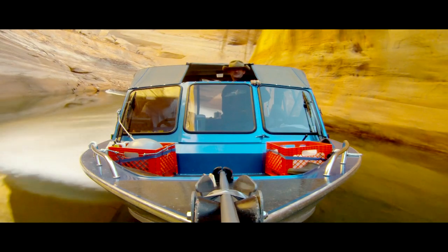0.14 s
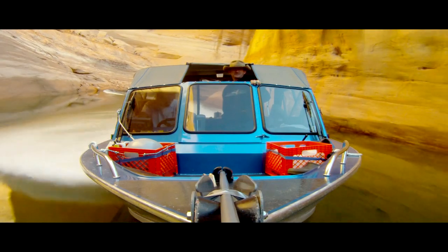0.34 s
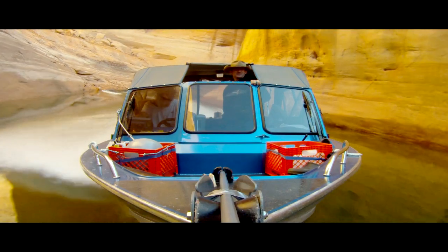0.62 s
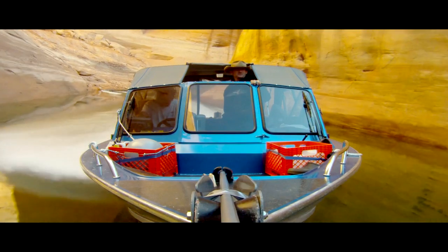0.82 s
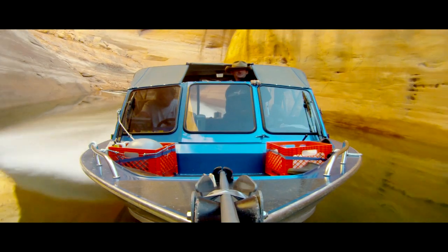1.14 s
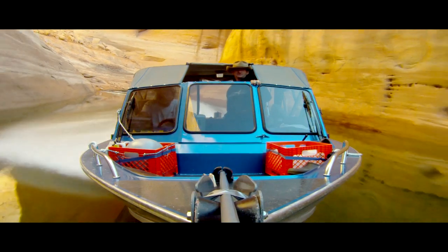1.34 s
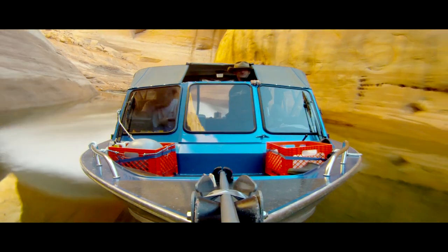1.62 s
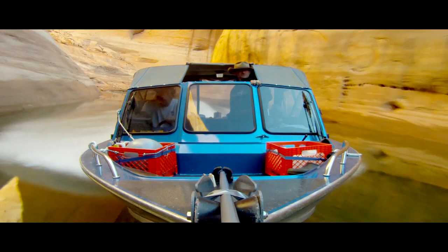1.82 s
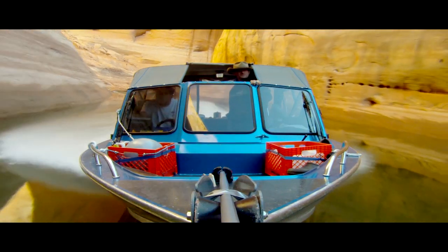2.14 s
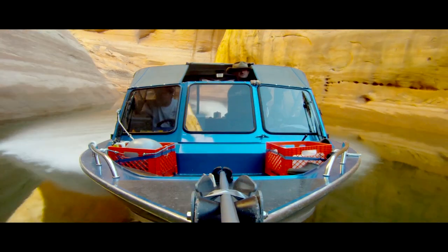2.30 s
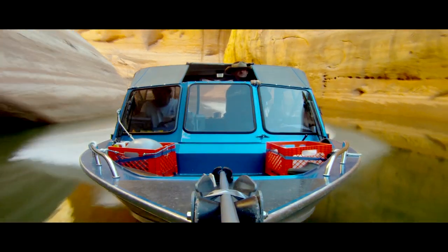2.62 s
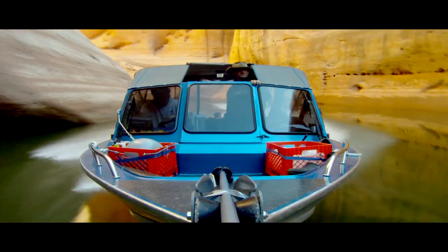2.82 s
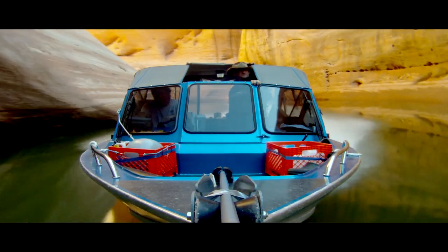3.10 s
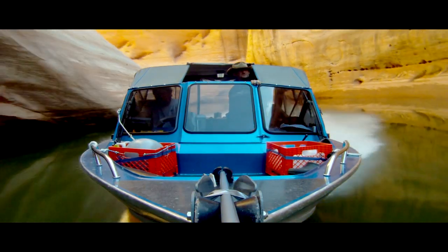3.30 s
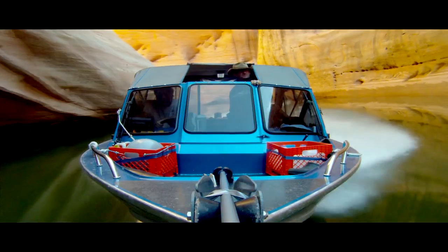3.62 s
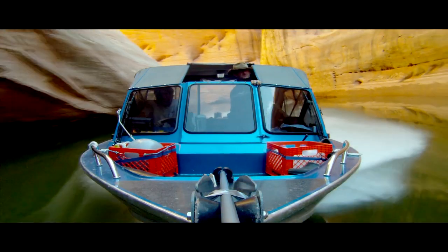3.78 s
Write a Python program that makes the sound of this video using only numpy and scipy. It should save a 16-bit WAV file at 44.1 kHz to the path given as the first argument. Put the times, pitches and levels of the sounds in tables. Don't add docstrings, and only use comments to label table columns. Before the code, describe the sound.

A jet boat's engine and pump hold a loud, low, buzzing drone from the start, fluttering as canyon-wall echoes thin it. Water rushes and drums the metal hull; a loose camera mount ticks. Slaps and knocks begin near 0.3 seconds, faint thin pump whines near 0.7. After 2.5 the pitch sags slightly and water hits harder, the drone choppier, until a cut-off at full roar. Close, boxy, gritty sound.

```python
import sys
import numpy as np
from scipy import signal
from scipy.fft import rfft, irfft
from scipy.io import wavfile
from scipy.ndimage import uniform_filter1d

SR = 44100
rng = np.random.default_rng(int(sys.argv[2]) if len(sys.argv) > 2 else 0)


def digitize_waveform(pressure):
    field = np.atleast_2d(pressure).T
    bounded = np.clip(field, -1, 1)
    quanta = np.round(bounded * 32767).astype(np.int16)
    wavfile.write(sys.argv[1], SR, quanta)


def amplitude_ratio(level_db):
    exponent = np.asarray(level_db, float) / 20
    return 10 ** exponent


N = 174195
T = np.arange(N) / SR

# time in seconds, cam turns per second.
CAM_SPEED = [
    (0, 33.14),
    (.45, 33.16),
    (1.0, 33.24),
    (1.5, 33.3),
    (1.95, 33.24),
    (2.55, 33.09),
    (2.85, 32.96),
    (3.45, 32.79),
    (3.95, 32.7),
]
# time in seconds, level in dB.
FIRING_LEVEL = [(0.0, -17.5), (0.26, -14.5), (0.53, -18.5), (0.79, -19), (1.05, -18.5), (1.31, -18),
                (1.58, -15), (1.84, -16.5), (2.1, -14), (2.36, -14.3), (2.63, -13.5), (2.89, -15),
                (3.15, -21), (3.41, -15), (3.68, -15.5), (3.94, -22.5)]
# time in seconds, level in dB.
BLADE_LEVEL = [(0.0, -21.5), (0.26, -18.5), (0.53, -18.5), (0.79, -19), (1.05, -17.5), (1.31, -19),
               (1.58, -24.5), (1.84, -20.5), (2.1, -20), (2.36, -26), (2.63, -21), (2.89, -23),
               (3.15, -18.7), (3.41, -21.5), (3.68, -19), (3.94, -23.5)]
# time in seconds, load in dB.
WATER_LOAD = [(0, -4.5), (.3, -2), (.6, -1.5), (1.1, -2), (1.5, -2.5), (1.95, -2), (2.25, -5), (2.5, -1),
              (2.7, -3.5), (2.8, 0), (3.0, 0.5), (3.07, -3.5), (3.2, 2.5), (3.38, 1), (3.5, -0.5),
              (3.65, 2), (3.8, 1), (3.95, 1.5)]
# order in cycles per cam turn, level in dB, share of the load in dB per dB.
WEAK_ORDERS = [(1, -57.5, 1), (2, -33.5, 0.93), (3, -46.5, 3), (4, -51, .1), (5, -34, -0.5), (7, -40, 3.5),
               (9, -35, 3), (10, -41.5, 1.2), (14, -41, 1.5), (24, -45, 1.1), (26, -42.5, 0.085),
               (11, -41, 1.5), (15, -49, .3), (18, -63.5, 8), (23, -53.5, .3), (28, -50, 0.33),
               (30, -44.5, .3), (31, -45.5, 0.32), (32, -54.5, .8), (36, -44, .6), (74.4, -68.5, .3)]
# pitch in Hz, width in Hz, level in dB, share of the load in dB per dB.
HULL_PANELS = [(180.3, 12, -47.5, 0.51), (203.6, 32, -31.5, 2.6), (267.2, 55.5, -29, 0.75),
               (313, 24.3, -37.5, 1.3), (330, 40, -43, 2), (383, 19.4, -32, 0.48), (463, 43, -42, 0.89),
               (532.6, 40, -45.5, 1.5), (690.7, 112, -41.5, 1.2), (777.7, 81, -46, 0.2),
               (918.3, 70, -42.5, 0.9), (1033, 57, -37, 0.5), (1095, 94, -37.5, 1.1),
               (1198.8, 99, -37.5, 1.01)]
# pitch in Hz, width in Hz, level in dB.
CASE_CAVITIES = [(1312.6, 44, -48.5), (1413, 190, -53.5), (1847, 180, -60), (2070, 150, -63.5),
                 (2472, 460, -54.5), (3105, 150, -66.5), (3543, 660, -58), (4530, 500, -62),
                 (5340, 750, -63.5)]
# frequency in Hz, density in dB per Hz.
WASH_COLOUR = [(20, -10), (45, -17.5), (130, -17), (300, 1.5), (420, -14), (600, -21.5), (1400, -35.5),
               (5500, -47)]
# time in seconds, level in dB.
WAVE_SLAPS = [(0.282, -9.5), (.706, -6), (0.829, -13), (1.099, -16), (1.244, -12.5), (1.399, -22),
              (1.572, -9.5), (2.0, -8.5), (2.774, -6), (2.835, -16.5), (2.957, -14), (3.014, -6),
              (3.19, -11.5), (3.255, -15), (3.352, -8.5), (3.381, -6), (3.585, -12), (3.71, -11.5),
              (3.873, -8), (3.901, -17)]
# pitch in Hz, time to fall 60 dB in seconds, level in dB.
SLAP_RING = [(394, 0.031, -15.5), (715, 0.084, -18.5), (1074, 0.025, -16), (1193, 0.019, -18.5),
             (2560, 0.087, -39.5)]
# time in seconds, depth in dB, half width in seconds.
ECHO_DIPS = [(0.03, 14, 0.027), (0.126, 11, 0.013), (0.23, 19.5, 0.022), (0.314, 4.5, 0.019),
             (0.421, 13, 0.018), (0.603, 4, 0.012), (0.664, 15, 0.018), (0.801, 4, 0.015),
             (0.888, 10, 0.011), (0.996, 1, 0.023), (1.077, 13, 0.0099), (1.175, 4.5, 0.0086),
             (1.227, 0, 0.0064), (1.283, -1, 0.018), (1.534, 9, 0.021), (1.921, 10, 0.013),
             (1.981, 5.5, 0.027), (2.125, 14.5, 0.022), (2.49, 13.5, 0.021), (2.609, 2.5, 0.038),
             (2.759, 13.5, 0.031), (2.855, 7, 0.019), (2.951, 9, 0.009), (2.987, 0, 0.011),
             (3.089, 21, 0.01), (3.216, 8, 0.0051), (3.275, 15, 0.0087), (3.322, 21, 0.021),
             (3.404, 7, 0.022), (3.485, 6.5, 0.012), (3.526, 8.5, 0.0056), (3.548, 9.5, 0.023),
             (3.607, 20, 0.014), (3.62, 28, 0.019), (3.692, 14.5, 0.011), (3.792, 10, 0.013),
             (3.837, 5, 0.0091)]
# time in seconds, rise over the steady whine in dB, half width in seconds.
WHINE_BURSTS = [(.72, 8, .05), (1.15, 3, .08), (1.6, 9, .03), (1.75, 9, .05), (1.99, 9.5, .03),
                (2.36, 10.5, .05), (2.65, 11, .03), (2.85, 12, .06), (3.22, 7, .03), (3.62, 15, .06),
                (3.85, 5, .05)]
# time in seconds, depth in dB, half width in seconds.
AIR_GULPS = [(1.129, 3, 0.03), (1.556, -2, 0.0073), (1.785, 9, 0.013), (2.374, 8.5, 0.022),
             (2.473, 19, 0.037), (2.547, 1.5, 0.014), (2.707, 6, 0.058), (2.818, 5, 0.012),
             (2.863, 8, 0.021), (2.938, 9, 0.017), (2.998, 7, 0.0073), (3.035, 15.5, 0.0093),
             (3.15, 14, 0.0056), (3.226, 4.5, 0.041), (3.308, 2, 0.016), (3.366, 0, 0.0082),
             (3.399, 6.5, 0.025), (3.547, 5, 0.014), (3.683, 14.5, 0.016), (3.757, 17.5, 0.014),
             (3.795, 9, 0.0059), (3.881, 4, 0.008)]
# time in seconds, order 16 level in dB, order 22 level in dB.
SINGING_ORDERS = [(0.0, -52, -39.5), (0.25, -49, -37), (0.49, -50.5, -37), (0.74, -50, -39),
                  (0.98, -48.5, -37.5), (1.23, -43.5, -40.5), (1.48, -57, -43), (1.72, -48.7, -40.5),
                  (1.97, -43.5, -40.5), (2.22, -46.5, -48), (2.46, -37.5, -35), (2.71, -41, -39),
                  (2.96, -37, -40.5), (3.2, -44, -32), (3.45, -42, -41), (3.69, -42, -33.5),
                  (3.94, -42.5, -41)]
# time in seconds, level in dB.
MOUNT_KNOCKS = [(.274, 13), (.695, 14), (1.102, 12), (1.248, 12.5), (1.361, 9), (1.566, 13.5), (1.623, 4),
                (1.791, 8.5), (2.001, 6), (2.594, 10.5), (2.684, 13.5), (2.843, 7), (2.892, 5),
                (3.073, 10.5)]


def unit_rms(x):
    return x / np.sqrt(np.mean(x ** 2) + 1e-20)


def curve(table, column=1):
    rows = np.array(table, float)
    return np.interp(T, rows[:, 0], rows[:, column])


def bumps(table):
    return sum(db * np.exp(-((T - s) / half_width) ** 2) for s, db, half_width in table)


def drift(top_hz):
    count, rate = 2048, 512
    spectrum = rfft(rng.standard_normal(count))
    hz = np.fft.rfftfreq(count, 1 / rate)
    smooth = irfft(spectrum * np.exp(-(hz / top_hz) ** 2))
    return np.interp(T, np.arange(count) / rate, unit_rms(smooth))


def resonate(x, hz, width):
    section = np.concatenate(signal.iirpeak(hz, hz / width, SR))
    return unit_rms(signal.sosfilt([section] * 3, x))


def shaft_tone(turns, db, wander):
    chop = 0.21
    shake = wander * np.clip(1 + chop * curve(WATER_LOAD), 0.2, 4)
    phase = 2 * np.pi * turns + 0.15 * shake * drift(27.0)
    level_db = db + 2.5 * shake * drift(20.0)
    return np.sqrt(2) * amplitude_ratio(level_db) * -np.sin(phase)


def firing(cam):
    return shaft_tone(8 * cam, curve(FIRING_LEVEL) - bumps(ECHO_DIPS), wander=0.3)


def impeller(cam):
    return shaft_tone(6 * cam, curve(BLADE_LEVEL) - bumps(AIR_GULPS), wander=0.3)


def singing_hull(cam):
    low = shaft_tone(16 * cam, curve(SINGING_ORDERS), wander=0.77)
    return low + shaft_tone(22 * cam, curve(SINGING_ORDERS, column=2), wander=0.55)


def weak_orders(cam):
    out = np.zeros(N)
    for order, db, share in WEAK_ORDERS:
        whole, high = round(order), order > 12.5
        offset = rng.random() if high or whole % 2 else 0
        level_db = db + share * curve(WATER_LOAD)
        if high:
            level_db = level_db + 1.2 * drift(8.1)
        out += shaft_tone(whole * cam + offset, level_db, wander=0.3 if order < 2.5 else 0.9)
    return out


def hull(cam):
    beat = 1 + 0.1 * np.cos(2 * np.pi * cam) + 0.072 * np.cos(4 * np.pi * cam + 0.56)
    drive = beat * amplitude_ratio(0.92 * drift(27.0)) * rng.standard_normal(N)
    load = curve(WATER_LOAD)
    panels = sum(amplitude_ratio(db + share * load) * resonate(drive, hz, width)
                 for hz, width, db, share in HULL_PANELS)
    case = sum(amplitude_ratio(db) * resonate(drive, hz, width) for hz, width, db in CASE_CAVITIES)
    return panels + amplitude_ratio(0.89 * load) * case


def wash():
    load = curve(WATER_LOAD)
    hz = np.fft.rfftfreq(N, 1 / SR)
    colour_hz, colour_db = np.transpose(WASH_COLOUR)
    colour = amplitude_ratio(np.interp(np.log(hz + 1), np.log(colour_hz + 1), colour_db))
    lumpy = rng.standard_normal(N) * amplitude_ratio(1.4 * drift(22.0))
    water = unit_rms(irfft(rfft(lumpy) * colour, N))
    rumble = resonate(rng.standard_normal(N), 36, 80) * amplitude_ratio(1.3 * drift(8.1))
    return amplitude_ratio(-28.5 + 0.98 * load) * water + amplitude_ratio(-42 + 2.4 * load) * rumble


def mount_ticks(push):
    per_second, peak_bias = 1000, 1.2
    chance = np.exp(peak_bias * unit_rms(push))
    hit = rng.random(N) < per_second / SR * chance / chance.mean()
    sizes = amplitude_ratio(2.8 * np.minimum(rng.exponential(1, N), 3.5))
    strikes = hit * sizes * rng.choice([-1., 1.], N)
    for s, db in MOUNT_KNOCKS:
        strikes[round(s * SR)] = amplitude_ratio(db + 10)
    ring = resonate(strikes, 4760, 2200)
    ring += 0.26 * resonate(strikes, 3400, 1200)
    ring += 0.5 * resonate(strikes, 2340, 700)
    return amplitude_ratio(-60 + 0.21 * curve(WATER_LOAD)) * unit_rms(ring)


def slap_sound():
    lead_s, push_hz, push_s = 0.006, 290, 0.0028
    t = np.arange(3000) / SR - lead_s
    after = np.maximum(t, 0)
    push = -np.sin(2 * np.pi * push_hz * t) * np.exp(-(t / push_s) ** 2)
    onset = np.clip(t / push_s + 1, 0, 1)
    thud = sum(amplitude_ratio(db - 60 * after / t60) * np.sin(2 * np.pi * hz * t) for hz, t60, db in SLAP_RING)
    hiss = signal.lfilter([1, -1], 1, rng.standard_normal(len(t)))
    tick = amplitude_ratio(-33 - 60 * after / 0.017) * hiss
    return push + onset * (thud + tick), lead_s


def slaps():
    slap, lead_s = slap_sound()
    chop_per_second = 35 * amplitude_ratio(1.5 * curve(WATER_LOAD))
    hits = rng.random(N) < chop_per_second / SR
    train = hits * amplitude_ratio(-27 + 3.5 * np.minimum(rng.exponential(1, N), 2.5))
    for s, db in WAVE_SLAPS:
        train[round((s - lead_s) * SR)] += amplitude_ratio(db - 1)
    return signal.oaconvolve(train, slap)[:N]


def pump_whine(cam):
    return shaft_tone(56 * cam, bumps(WHINE_BURSTS) - 68, wander=1.0)


def scene():
    cam = np.cumsum(curve(CAM_SPEED)) / SR - 0.45
    machinery = firing(cam) + impeller(cam) + singing_hull(cam) + weak_orders(cam)
    body = machinery + hull(cam) + wash() + slaps() + pump_whine(cam)
    return (body + mount_ticks(body))[None]


def roll_off(x):
    return signal.sosfilt(signal.butter(12, 15120, fs=SR, output="sos"), x)


def record(dry):
    knee_db, squeeze = -16.5, 0.21
    power = abs(uniform_filter1d(dry[0] ** 2, size=1500))
    over_db = np.maximum(10 * np.log10(power + 1e-9) - knee_db, 0)
    x = dry[0] * amplitude_ratio(-squeeze * uniform_filter1d(over_db, size=600))
    x = signal.sosfilt(signal.butter(10, 5900, fs=SR, output="sos"), x)
    coarse = signal.resample_poly(x, 40, 147)
    held = np.repeat(coarse, 4)
    x = signal.resample_poly(held, 147, 160)[:N]
    mix = np.pad(x, (0, N - len(x)))[None]
    return roll_off(mix)


dry = scene()
out = record(dry)
digitize_waveform(out)
```